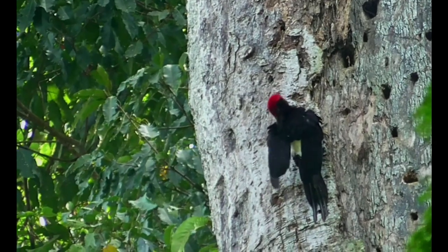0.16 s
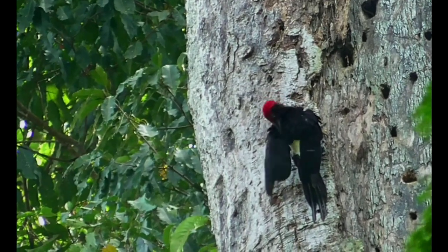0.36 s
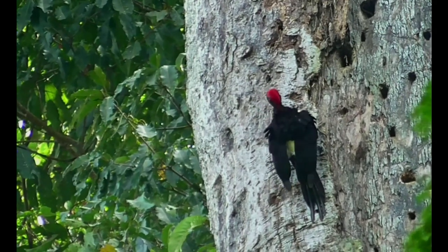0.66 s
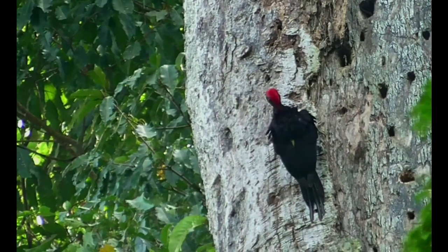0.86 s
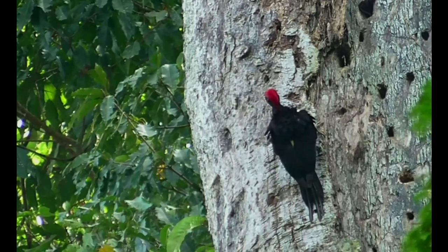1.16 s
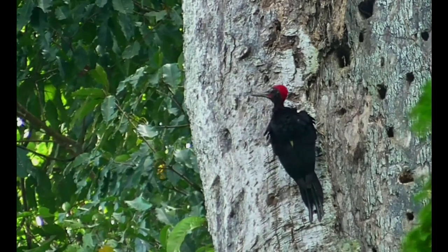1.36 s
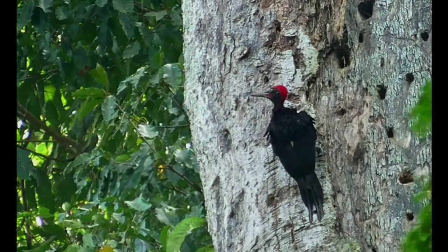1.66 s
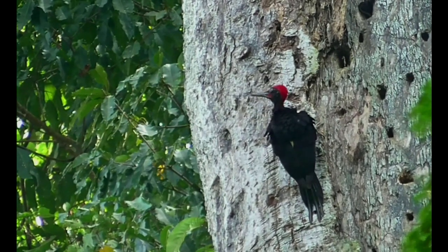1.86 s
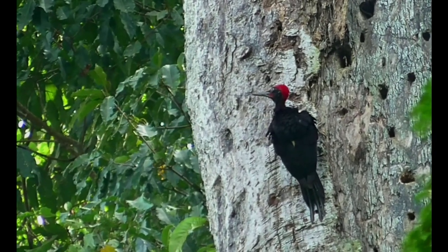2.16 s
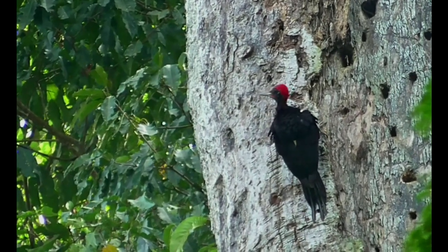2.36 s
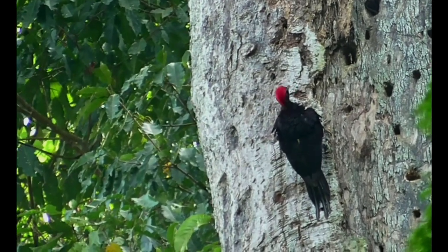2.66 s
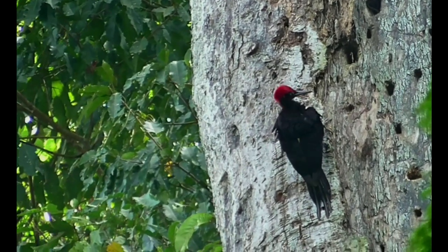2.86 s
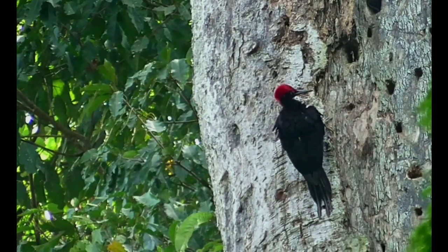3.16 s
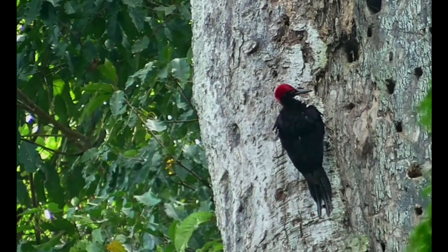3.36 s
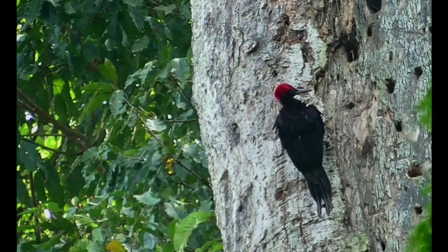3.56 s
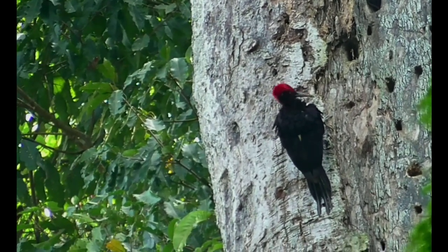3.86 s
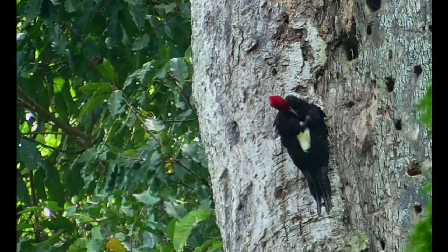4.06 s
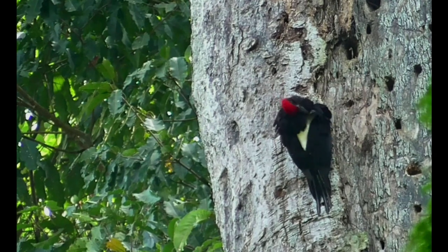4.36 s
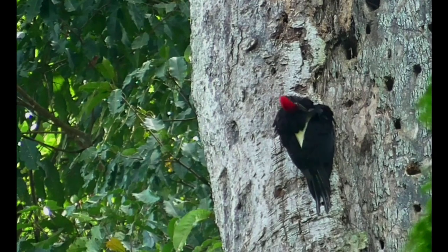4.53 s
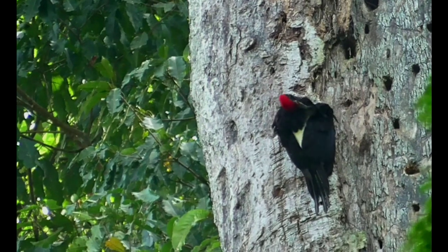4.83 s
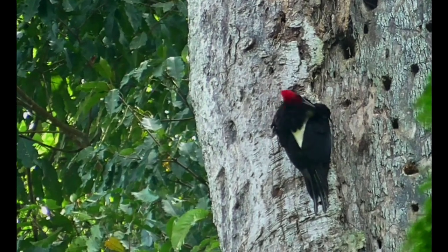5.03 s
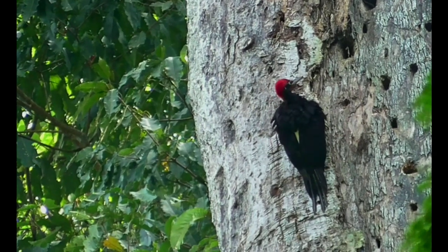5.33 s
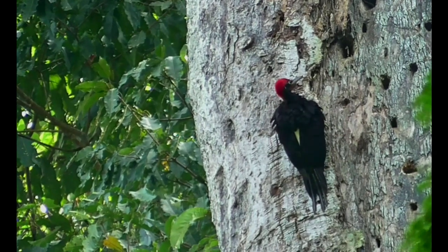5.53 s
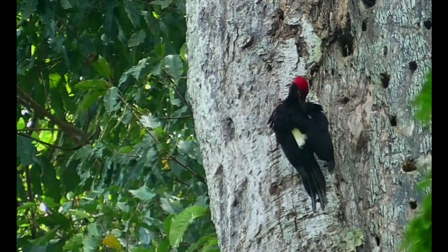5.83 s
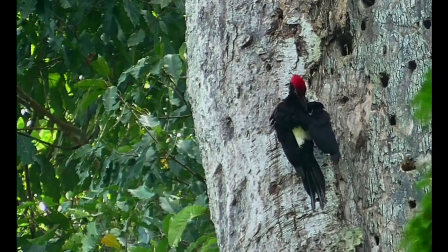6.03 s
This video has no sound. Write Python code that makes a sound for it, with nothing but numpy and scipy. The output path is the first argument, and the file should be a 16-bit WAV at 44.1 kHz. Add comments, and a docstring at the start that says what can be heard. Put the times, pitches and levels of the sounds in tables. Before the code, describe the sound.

Five soft rolling hoots, each a fast run of falling tones ending on a short held note, ring through the trees, the first already under way. Thin slurs, soft coos and distant sweet whistled phrases come and go. Dull low bumps and puffs of air open the scene. Very faint feather rustling grows late, bark ticks sharply, and a closer roll answers the fifth call. Mono outdoor pickup, faint hiss.

```python
"""Forest: from the start a woodpecker preens on a dead trunk, its feathers rustling as filtered noise; low
thumps and puffs of air sound. A bird gives five rolled calls of quick falling tones, the first under way.
A songbird further off soon whistles short phrases of arched glides; soft coos and thin slurs come and go.
Late, noise bursts scuff and tick on the bark, and a nearer bird answers the fifth roll.
Synthetic echoes from the trees follow birds and bark; hiss lies under all."""
import sys
import numpy as np
from scipy import signal
from scipy.fft import rfft, irfft, next_fast_len
from scipy.io import wavfile
from scipy.ndimage import uniform_filter1d

SR = 44100
rng = np.random.default_rng(int(sys.argv[2]) if len(sys.argv) > 2 else 0)


def inscribe(sig):
    """Save sig as 16-bit PCM at rate SR to the path in sys.argv[1].

    A 1-D sig is mono; a 2-D sig holds one channel per row.
    Samples are clipped to [-1, 1] before scaling.
    """
    pcm = np.round(np.clip(np.atleast_2d(sig).T, -1, 1) * 32767)
    wavfile.write(sys.argv[1], SR, pcm.astype(np.int16))


N = 272979

# Rolled calls. Each row: start in s, pitch in Hz, relative level in dB, note spacing in s,
# share of the glide kept from note to note, closing note length in s, lead-in relative level in dB.
ROLLS = [(-.081, 1046, -29.5, 0.04, 0.88, 0.07, -57), (1.271, 1042, -30, .0395, 0.76, 0.051, -59),
         (2.603, 1036, -30.5, 0.04, 0.77, 0.049, -53.5), (3.94, 1045, -30, .0393, 0.78, 0.0582, -58.5),
         (5.255, 1036, -31, 0.037, 0.832, 0.061, -54), (5.755, 1097, -23.5, .038, 0.98, 0.0437, -45)]
ANSWER_S = 5.7  # rolls after this come from the nearer bird
NOTE_S = 0.02966
GLIDE_UP, GLIDE_DOWN = 0.1803, 0.18  # first note falls from this share above the pitch to this share below
PICKUP_S, PICKUP_HZ, PICKUP_DB = 0.017, 1162, -25.5  # faint catch of the voice; dB relative to the call
SOFT_START_DB, SWELL = -6, 0.44  # first note is softer; each next keeps this share of the dB shortfall
FIRST_LATE_S = 0.005
CLOSE_FROM, CLOSE_HZ, CLOSE_DB = 1.015, 1016.5, -2  # start as ratio to the pitch, end pitch, level re call


def roll_notes(calls, count=4):
    """A roll is a faint pickup, four falling notes, each louder and flatter than the last, and one held note."""
    notes = []
    for start_s, hz, db, spacing_s, kept, hold_s, _ in calls:
        notes.append((start_s - PICKUP_S, NOTE_S, PICKUP_HZ, PICKUP_HZ, db + PICKUP_DB))
        for k in range(count):
            note_s = start_s + max(k * spacing_s, FIRST_LATE_S)
            first_hz = hz * (1 + GLIDE_UP * kept ** k)
            last_hz = hz * (1 - GLIDE_DOWN * kept ** k)
            notes.append((note_s, NOTE_S, first_hz, last_hz, db + SOFT_START_DB * SWELL ** k))
        notes.append((start_s + count * spacing_s, hold_s, hz * CLOSE_FROM, CLOSE_HZ, db + CLOSE_DB))
    return notes


# Spectrum of the rasp in the voice. Each row: frequency in Hz, relative density in dB per Hz.
RASP = [(300, -24.5), (700, -5), (1300, 3), (1700, -5), (2100, -6), (2500, -11), (3000, -19), (4500, -30.5),
        (8000, -39)]


def rolled(notes, rasp_db, octave_db, early_db, late_db, count=4):
    """Hoots with their echoes; the faint rasp and octave come back mostly from the trees."""
    # successive notes find slightly different paths through the swaying foliage
    parts = [hoots(notes[k::count]) for k in range(count)]
    echo = sum(trees(part, early_db=early_db, early_t60_s=0.054, late_db=late_db) for part in parts)
    voice = sum(parts)
    strength = abs(signal.hilbert(voice, next_fast_len(N))[:N]) + 1e-9
    rasp = gain_of(rasp_db) * strength * hiss(RASP, patchy_db=9.5)
    octave = gain_of(octave_db) * (2 * voice ** 2 / strength - strength)  # squaring doubles the pitch
    return voice + echo + trees(rasp + octave, early_db=3.5, early_t60_s=0.14, late_db=2)


def caller():
    """The repeated call: the further bird has a strong late echo."""
    notes = roll_notes([call for call in ROLLS if call[0] < ANSWER_S])
    return gain_of(-0.5) * rolled(notes, rasp_db=-32.0, octave_db=-39.5, early_db=-7.5, late_db=-4.0)


def answer():
    """The nearer bird's roll: little late echo, more rasp and octave."""
    notes = roll_notes([call for call in ROLLS if call[0] > ANSWER_S])
    return gain_of(0.6) * rolled(notes, rasp_db=-27.5, octave_db=-34.0, early_db=-2.5, late_db=-12.0)


def lead_ins(ahead_s=0.156, length_s=0.027, first_hz=890, last_hz=832):
    """One soft low falling note comes before each roll."""
    notes = [(start_s - ahead_s, length_s, first_hz, last_hz, db) for start_s, *_, db in ROLLS]
    return among_trees(hoots(notes), direct_db=2.0, early_db=-8.5, early_t60_s=0.13, late_db=-7.5)


# Feather strokes of the bill. Each row: peak time in s, fade in s, relative treble level in dB.
STROKES = [(0, 0.27, -77), (1.8, 0.098, -87), (2.135, 0.041, -87.5), (2.74, .08, -98), (3.7, 0.18, -83),
           (4.49, 0.19, -90.5), (4.66, 0.14, -79), (5.061, 0.146, -81.5), (5.263, 0.13, -71.5),
           (5.459, 0.33, -76.5), (5.74, 0.089, -66.5), (5.99, 0.29, -72.5), (6.178, 0.088, -66.5)]
STROKE_RISE_S, RESTING_DB = 0.021, -102  # the feathers never lie quite still
# Spectrum of the rustle. Each row: frequency in Hz, relative density in dB per Hz.
FEATHERS = [(150, 0.5), (450, -6), (900, 16), (2000, 10.5), (4500, 10.5), (6500, 5), (9000, -1.5),
            (12000, 2), (15500, -23.5)]


def rustle(grain_db=-1.0, level_db=-1.0, crackle_db=-5.0, snaps_per_s=70, snap_fade_s=0.0005):
    """Feathers slide over each other in uneven strokes, and single barbs snap: noise under swells."""
    stroke = swells([(peak_s, STROKE_RISE_S, fade_s, db) for peak_s, fade_s, db in STROKES], RESTING_DB)
    snaps = (rng.random(N) < snaps_per_s / SR) * np.minimum(rng.exponential(1, N), 3)
    snaps = signal.oaconvolve(snaps, np.exp(-np.arange(400) / SR / snap_fade_s))[:N]
    grain = gain_of(level_db + grain_db * wander(N, size=300)) + gain_of(crackle_db) * snaps
    return stroke * grain * hiss(FEATHERS, patchy_db=3.0, band_hz=(7500, 10500))


# Scuffs on the bark. Each row: start in s, pitch in Hz, width of one resonator pass in Hz, fade in s,
# relative level in dB.
SCUFFS = [(4.46, 2080, 1620, 0.052, -62.5), (5.7283, 4430, 1250, 0.0031, -38),
          (5.734, 5910, 6000, 0.033, -85), (5.741, 690, 128.4, 0.019, -51.5),
          (5.945, 435, 123, 0.0236, -53), (5.95, 906, 243, 0.016, -43.5)]


def scuffs():
    """Claws, bill and wing brush the trunk: noise bursts in one broad resonance; long ones start softly."""
    out, t = np.zeros(N), np.arange(SR // 4) / SR
    for start_s, hz, width_hz, fade_s, db in SCUFFS:
        body = signal.iirpeak(hz, hz / width_hz, fs=SR)
        burst = signal.lfilter(*body, signal.lfilter(*body, rng.standard_normal(len(t))))
        envelope = 2 * (np.exp(-t / fade_s) - np.exp(-4 * t / fade_s))
        add(out, start_s, gain_of(db) * evened(burst) * envelope)
    return among_trees(out, direct_db=0, early_db=-10.0, early_t60_s=0.053, late_db=-14.5)


# The songbird's syllables by name, note by note. Each row: delay in s and length in s before stretching,
# first, middle and last pitch in Hz before transposing, relative level in dB.
SYLLABLES = { "opening": [(0, .067, 2523, 2390, 2327, -1), (.046, .06, 2741, 2395, 2173, 0)],
             "rise": [(0, 0.022, 1798, 2365, 2600, -4.5), (.02, .04, 2477, 2798, 3194, 0)],
             "hop": [(0, 0.016, 2120, 2103, 2216, -0.5), (.033, 0.016, 2600, 2674, 2710, -0.5)],
             "level": [(0.00033, .051, 3100, 3380, 3100, 0)], "step": [(0, 0.037, 2304, 2352, 2320, 0.5),
             (.032, .031, 1815, 1682, 1600, -4.5)], "slide": [(0.00088, .04, 1880, 1660, 1620, 1)],
             "arch": [(0.00017, .05, 2480, 2665, 2540, -0.5)], "drop": [(0, .023, 2459, 2169, 1755, -0.5),
             (.021, .053, 1696, 1653, 1480, -5)]}
# The song. Each row: start in s, syllable name, middle pitch of its first note in Hz, length ratio,
# relative level in dB.
PHRASES = [(.225, "opening", 2415, 1.03, -41.5), (0.437, "rise", 2330, 1.03, -39),
           (.495, "level", 3380, 1.24, -41), (.568, "step", 2369, 0.98, -39.5),
           (.639, "arch", 2665, 0.99, -39), (.693, "drop", 2183, 0.86, -40),
           (1.242, "arch", 2372, 1.46, -58.5), (1.29, "slide", 1668, 0.89, -59.5),
           (1.451, "level", 3570, 0.64, -63), (1.475, "hop", 2088, 1.05, -52.5),
           (1.537, "level", 3116, 0.69, -50.5), (1.613, "step", 2560, 1.15, -52),
           (1.683, "arch", 2727, 2.02, -55), (1.741, "drop", 2200, 1.6, -53),
           (3.271, "arch", 2566, 0.98, -57.5), (3.328, "level", 3336, 0.69, -63.5),
           (3.395, "level", 2335, 0.64, -50.5), (3.439, "slide", 1600, 0.78, -64),
           (3.476, "arch", 2628, 1.16, -53.5), (3.521, "drop", 2207, .92, -46),
           (5.027, "level", 3010, 0.86, -56), (5.125, "opening", 2340, 1.16, -44),
           (5.4, "rise", 2285, 1.24, -44), (5.481, "level", 3355, 0.98, -42.5),
           (5.556, "slide", 1820, 0.86, -44.5), (5.623, "drop", 2125, 0.775, -42)]


def song():
    """Each syllable is sung at its own pitch, pace and strength."""
    notes = []
    for start_s, name, hz, stretch, db in PHRASES:
        ratio = hz / SYLLABLES[name][0][3]
        for delay_s, length_s, first, middle, last, note_db in SYLLABLES[name]:
            pitches_hz = (first * ratio, middle * ratio, last * ratio)
            notes.append((start_s + delay_s * stretch, length_s * stretch, *pitches_hz, db + note_db))
    dry_song = whistles(notes, waver=0.016, taper=0.38, flutter_db=2.5)
    return among_trees(dry_song, direct_db=-2.5, early_db=-2.5, early_t60_s=0.17, late_db=-5.0)


# Thin slurs from high in the canopy. Each row: start in s, length in s, first, middle and last pitch in Hz,
# relative level in dB.
SLURS = [(.005, 0.047, 3720, 3487, 3330, -56.5), (.055, 0.053, 3230, 2983, 2430, -52.5),
         (.33, 0.11, 6300, 6120, 5680, -79.5), (.98, 0.25, 5780, 5815, 6380, -73),
         (1.1, 0.093, 6040, 6480, 6600, -67.5), (1.99, 0.027, 3640, 3720, 4150, -73.5),
         (2.27, 0.16, 4970, 5000, 5500, -86), (2.53, 0.083, 2800, 3250, 3660, -78.5),
         (2.82, 0.066, 4100, 4050, 4120, -82.5), (3.37, 0.085, 6380, 6020, 5450, -77.5),
         (3.51, 0.15, 6700, 7070, 7290, -77.5), (3.585, 0.067, 3900, 4360, 4870, -66),
         (3.645, 0.089, 4600, 5144, 6076, -57.5), (5.29, 0.16, 4300, 4290, 4010, -81),
         (5.46, 0.12, 4015, 4054, 3730, -74), (5.96, 0.052, 3760, 3504, 3300, -58),
         (6.012, 0.036, 3379, 3080, 2850, -56)]


def slurs():
    """Thin fluttering whistles with a strong echo."""
    thin = whistles(SLURS, waver=0.025, taper=0.39, flutter_db=4.5)
    return among_trees(thin, direct_db=-2.5, early_db=-2.5, early_t60_s=0.46, late_db=-1.5)


# Stray soft coos. Each row: start in s, length in s, first and last pitch in Hz, relative level in dB.
COOS = [(1.085, 0.044, 1147, 1092, -57.5), (4.595, 0.067, 1208, 1406, -58), (4.675, 0.017, 1057, 873, -55),
        (4.742, 0.095, 1004, 1152, -55.5), (4.88, 0.038, 966, 1050, -64.5), (5.088, 0.045, 1203, 1080, -56)]


def coos():
    """Soft hollow slides, some rising, some falling."""
    return among_trees(hoots(COOS), direct_db=0.5, early_db=-9, early_t60_s=0.18, late_db=-4.5)


# Low thumps. Each row: start in s, pitch in Hz, relative level in dB.
THUMPS = [(.006, 105.5, -49), (0.261, 110, -52), (0.287, 98, -41), (.326, 152, -46), (.365, 86.9, -43.5),
          (0.424, 101.2, -50.5), (0.536, 108, -47), (1.795, 129, -64), (3.626, 89, -38), (3.687, 82, -49),
          (5.949, 116.6, -49), (6.02, 120.6, -54)]


def thumps(rise_s=0.00227, ring_db=-17, fade_s=0.098):
    """Each thump is a soft push of about one cycle with a dull flutter of low-passed noise behind it."""
    out, t = np.zeros(N), np.arange(SR // 4) / SR
    for start_s, hz, db in THUMPS:
        push = (t / rise_s / 2) ** 2 * np.exp(2 - t / rise_s) * np.sin(2 * np.pi * hz * t)
        lowpass = signal.butter(2, hz, fs=SR, output="sos")
        flutter = evened(signal.sosfilt(lowpass, rng.standard_normal(len(t))))
        add(out, start_s, gain_of(db) * (push + gain_of(ring_db) * flutter * np.exp(-t / fade_s)))
    return out


# The clearest far hollow sounds. Each row: start in s, length in s, first and last pitch in Hz,
# relative level in dB.
FAR_LOW = [(.66, 0.04, 343.6, 307, -70.5), (4.11, 0.034, 317, 331, -66.5), (4.16, 0.038, 206.3, 209, -72.5),
           (4.22, 0.036, 242.5, 290, -67), (4.405, 0.028, 410, 366, -68.5), (5.25, 0.024, 236, 194, -66),
           (5.33, 0.0365, 253, 308, -69.5)]
FAR_HZ, FAR_SPREAD, FAR_LENGTH_S, FAR_DB = 290, 0.16, 0.046, -88  # random ones; spread is a share of pitch


def far_hollows(count=8):
    """Low hollow notes from far off, with fainter ones at random times and pitches."""
    notes = list(FAR_LOW)
    for when, first, last in rng.random((count, 3)):
        first_hz = FAR_HZ * (1 + FAR_SPREAD * (2 * first - 1))
        last_hz = FAR_HZ * (1 + FAR_SPREAD * (2 * last - 1))
        notes.append((when * N / SR, FAR_LENGTH_S, first_hz, last_hz, FAR_DB))
    return among_trees(hoots(notes), direct_db=0.5, early_db=-0.5, early_t60_s=0.21, late_db=-3)


# Puffs of low air. Each row: peak time in s, spread to either side in s, relative level in dB.
PUFFS = [(0, 0.094, -52), (.34, .14, -49.5), (.8, 0.15, -64.5), (1.329, 0.079, -74), (1.799, 0.2, -69),
         (2.72, 0.039, -73), (3.17, 0.13, -65), (3.65, 0.14, -60), (4.15, 0.15, -70.5), (5.298, 0.092, -71),
         (5.76, 0.089, -56), (6.0, 0.072, -59.5)]
# Spectrum of the puffs. Each row: frequency in Hz, relative density in dB per Hz.
RUMBLE = [(10, -2.5), (38, 1.5), (60, -7), (100, -15), (250, -19.5), (800, -65)]
# Spectrum of the forest hiss. Each row: frequency in Hz, relative density in dB per Hz.
FOREST = [(18, -21), (35, -8.5), (70, -24), (110, -25), (170, -20.5), (270, -10.5), (400, -15.5),
          (620, -19), (1000, -16), (1400, -19.5), (2200, -40.5), (3500, -47), (9500, -31.5), (15700, -14.5)]
FOREST_DB, CALM_DB = -71, -96  # hiss rms; resting level of the puffs before the draught gain


def air(draught_db=-3):
    """Quiet forest hiss and a low stir of air, both coloured noise."""
    puffs = swells([(peak_s, spread_s, spread_s, db) for peak_s, spread_s, db in PUFFS], CALM_DB)
    draught = gain_of(draught_db) * puffs * hiss(RUMBLE, patchy_db=-1.0)
    return gain_of(FOREST_DB) * hiss(FOREST, patchy_db=5.5) + draught


# Decay of the forest wash. Each row: frequency in Hz, time to fall 60 dB in s.
ECHO_T60 = [(300, 1), (1000, 0.8), (1800, 0.72), (3000, 1), (5000, .8), (9000, 0.25)]


def trees(x, early_db, early_t60_s, late_db, clump_db=3.5, taps_per_s=2000, gap_s=0.004, late_rise_s=0.016):
    """Quick echoes from the nearest trunks, then a long wash from the forest that dies band by band."""
    t = np.arange(SR * 3 // 2) / SR
    hz, when_s, z = signal.stft(rng.standard_normal(len(t)), SR, nperseg=512)
    # foliage returns high notes in clumps
    clumps = smoothed_patches(z.shape, bins=4, frames=4) * np.minimum(hz / 2500, 1)[:, None]
    z = z / (abs(z) + 1e-12) * gain_of(clump_db * clumps)
    decay = gain_of(-60 * when_s / read(ECHO_T60, hz)[:, None])
    late = signal.istft(z * decay, SR, nperseg=512)[1][:len(t)]
    late *= 1 - np.exp(-t / late_rise_s)
    taps = rng.choice([-1, 1], len(t)) * (rng.random(len(t)) < taps_per_s / SR)
    early = taps * (t > gap_s) * gain_of(-60 * t / early_t60_s)
    echo = gain_of(early_db) * early / np.linalg.norm(early) + gain_of(late_db) * late / np.linalg.norm(late)
    return signal.fftconvolve(x, echo)[:N]


def among_trees(x, direct_db, **echo):
    """Direct sound plus its echo; the balance tells the distance."""
    return gain_of(direct_db) * x + trees(x, **echo)


def whistle(hz, taper, waver, second_db):
    """One nearly pure note on a pitch curve, swelling and fading, with a faint octave."""
    phase = 2 * np.pi * np.cumsum(hz * (1 + waver * wander(len(hz), size=200))) / SR
    tone = np.sin(phase) + gain_of(second_db) * np.sin(2 * phase)
    return tone * signal.windows.tukey(len(hz), np.clip(taper, 0, 1))


def hoots(notes, octave_db=-50):
    """Short hollow notes, each sliding straight from one pitch to another."""
    out = np.zeros(N)
    for start_s, length_s, first_hz, last_hz, db in notes:
        hz = np.linspace(first_hz, last_hz, int(length_s * SR))
        add(out, start_s, gain_of(db) * whistle(hz, taper=0.8, waver=0.005, second_db=octave_db))
    return out


def whistles(notes, waver, taper, flutter_db):
    """Whistles on a parabola through three pitches, with a quick flutter in level."""
    out = np.zeros(N)
    for start_s, length_s, first_hz, middle_hz, last_hz, db in notes:
        u = np.linspace(0, 1, int(length_s * SR))
        hz = np.polyval(np.polyfit([0, 0.5, 1], [first_hz, middle_hz, last_hz], 2), u)
        level = gain_of(db + flutter_db * wander(len(u), size=400))
        add(out, start_s, level * whistle(hz, taper=taper, waver=waver, second_db=-47.0))
    return out


def hiss(spectrum, patchy_db, band_hz=None):
    """Coloured noise with drifting patches; rms 1 overall or within a band."""
    _, _, z = signal.stft(rng.standard_normal(N), SR, nperseg=1024, noverlap=768)
    patches = smoothed_patches(z.shape, bins=24, frames=6)
    x = signal.istft(z * gain_of(patchy_db * patches), nperseg=1024, noverlap=768)[1][:N]
    hz = np.fft.rfftfreq(N, 1 / SR)
    z = rfft(x) * gain_of(read(spectrum, hz))
    inside = 1 if band_hz is None else (hz > band_hz[0]) & (hz < band_hz[1])
    return irfft(z, N) / np.std(irfft(z * inside, N))


def smoothed_patches(shape, bins, frames):
    """Random time-frequency patches of rms 1."""
    across = uniform_filter1d(rng.standard_normal(shape), size=bins, axis=0)
    return evened(uniform_filter1d(across, size=frames, axis=1))


def swells(events, rest_db):
    """Level of (peak s, rise s, fade s, dB) swells, exponential both ways, over a resting level."""
    t = np.arange(N) / SR
    power = gain_of(rest_db) ** 2
    for peak_s, rise_s, fade_s, db in events:
        shape = np.exp(-np.maximum((peak_s - t) / rise_s, (t - peak_s) / fade_s))
        power = power + (gain_of(db) * shape) ** 2
    return np.sqrt(power)


def wander(count, size):
    """Smooth random curve of rms 1 that changes over size samples."""
    return evened(signal.fftconvolve(rng.standard_normal(count + size - 1), np.hanning(size), "valid"))


def gain_of(db):
    """Decibels to gain."""
    return 10 ** (np.asarray(db) / 20)


def evened(x):
    """Scales to rms 1."""
    return x / np.sqrt(np.mean(x ** 2) + 1e-20)


def read(points, hz):
    """Joins points on a log-frequency axis."""
    f, value = np.transpose(points)
    return np.interp(np.log(hz + 1), np.log(f + 1), value)


def add(mix, start_s, sound):
    """Adds a sound at its start time; what lies before zero is lost."""
    at = round(start_s * SR)
    sound = sound[max(-at, 0):]
    part = mix[max(at, 0):][:len(sound)]
    part += sound[:len(part)]


def scene():
    """Sums birds, woodpecker, thumps and air into one channel."""
    birds = caller() + answer() + lead_ins() + song() + slurs() + coos()
    woodpecker = rustle() + scuffs()
    return (birds + woodpecker + thumps() + far_hollows() + air())[None]


def record(dry, edge_hz=15800):
    """The recorder's band limit: a linear-phase low-pass."""
    lowpass = signal.firwin(511, edge_hz, window=("kaiser", 9), fs=SR)
    return signal.oaconvolve(dry, lowpass[None], "same")


dry = scene()
out = record(dry)
inscribe(out)
```